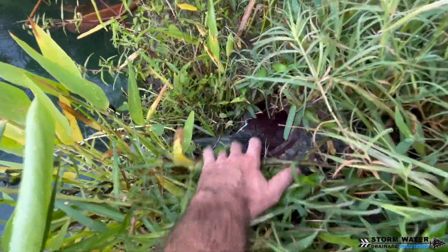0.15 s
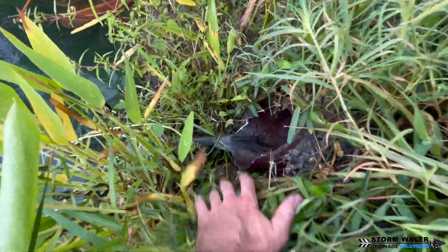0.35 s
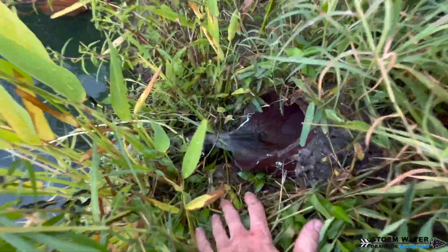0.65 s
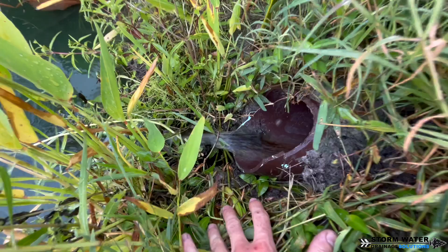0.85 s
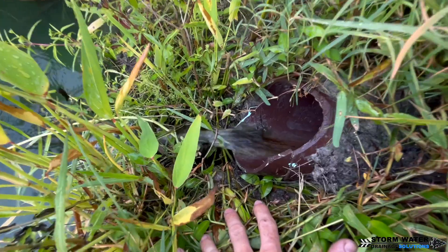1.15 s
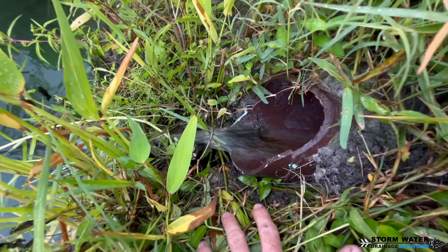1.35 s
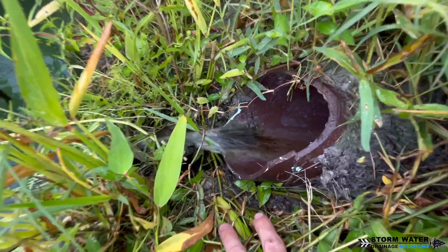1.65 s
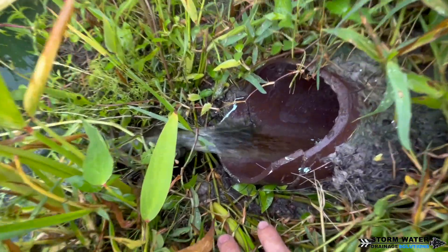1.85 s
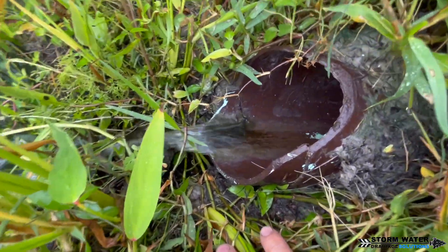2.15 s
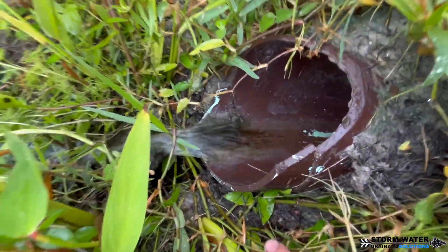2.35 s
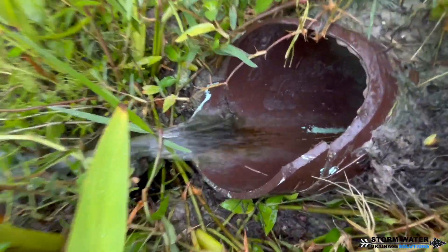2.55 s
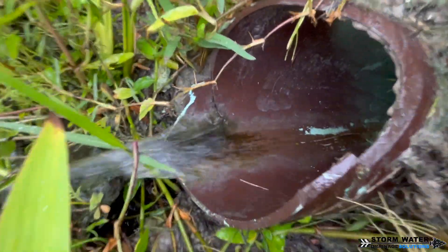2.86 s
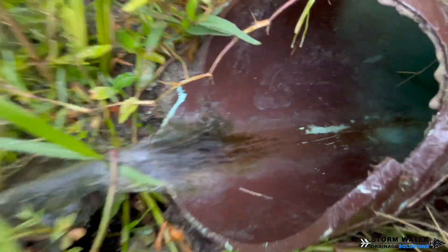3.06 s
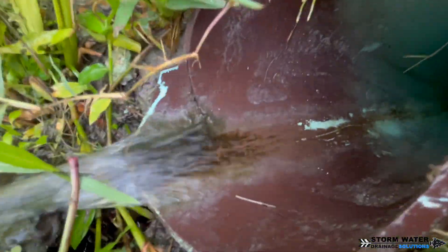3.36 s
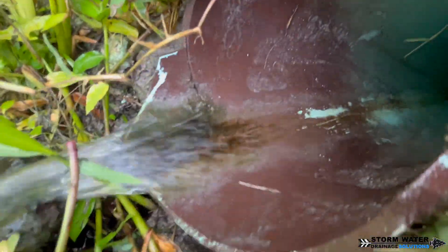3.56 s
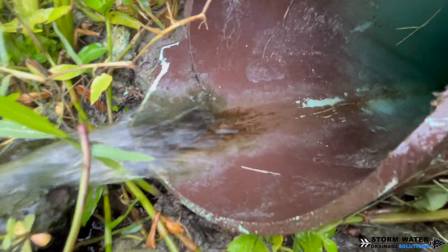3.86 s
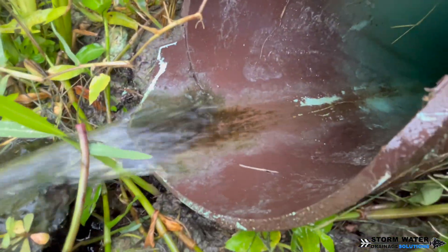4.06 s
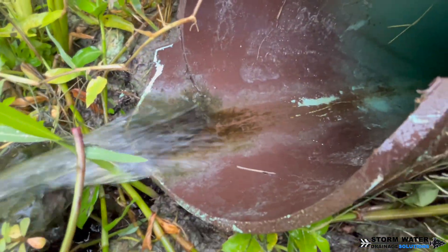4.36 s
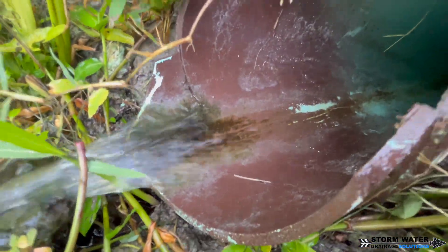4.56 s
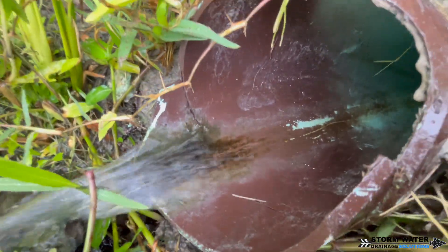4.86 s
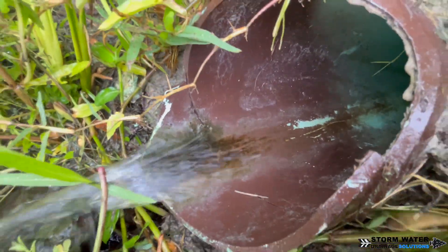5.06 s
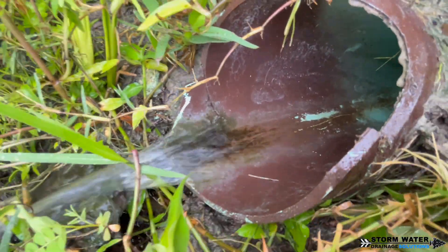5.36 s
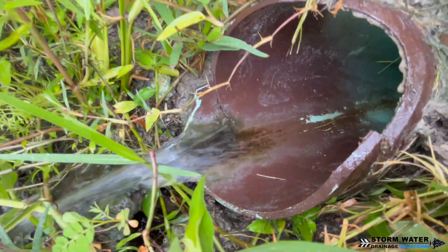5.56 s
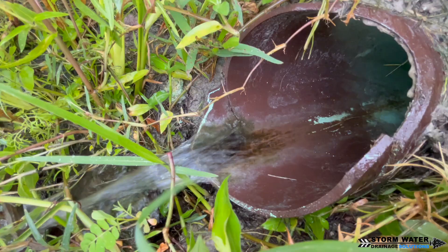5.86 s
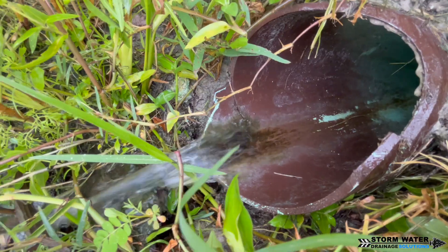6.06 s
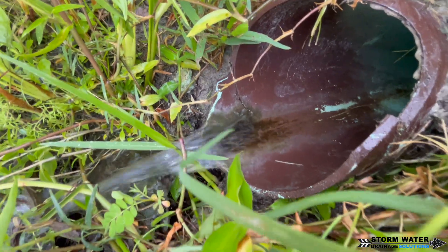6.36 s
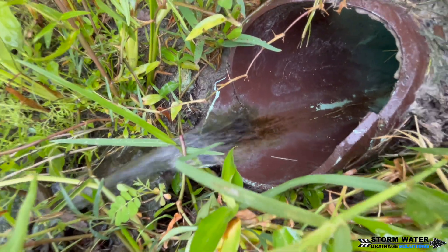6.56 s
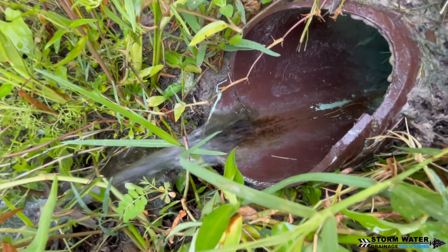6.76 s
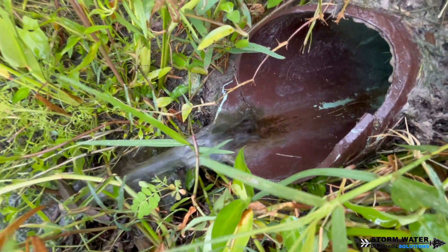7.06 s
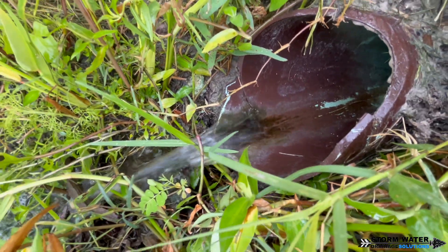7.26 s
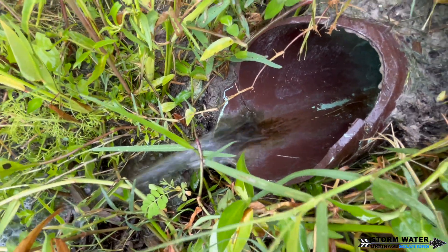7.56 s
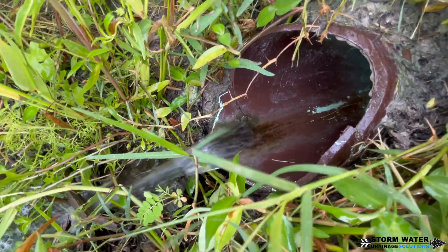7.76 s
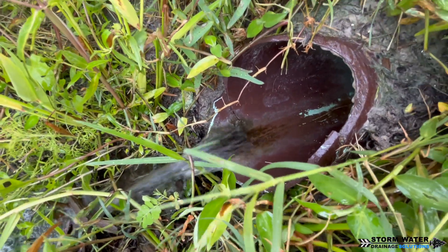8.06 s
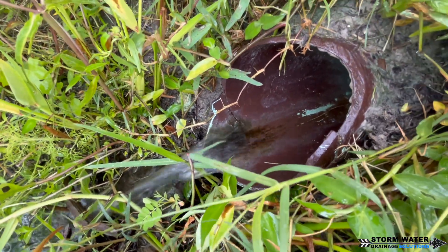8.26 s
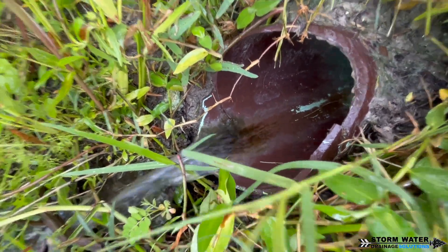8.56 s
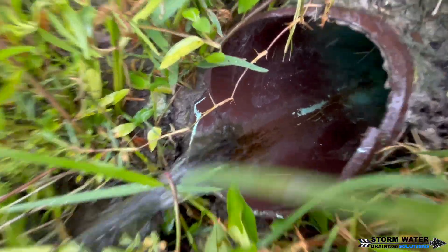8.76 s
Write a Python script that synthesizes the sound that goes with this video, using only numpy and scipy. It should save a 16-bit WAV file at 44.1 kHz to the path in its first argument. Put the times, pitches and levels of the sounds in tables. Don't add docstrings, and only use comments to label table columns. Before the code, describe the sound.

Water runs continuously from a wide clay drain pipe through grass into a pond, heard close by a hand-held stereo microphone in open air. Bright fizz, fine hissing spray and crackling drops lie over a hollow, uneven gurgle. Short gulps pop at the pipe mouth, one distinct at 1 second, with duller glugs deeper inside. Around 2 seconds a longer slop, ringing plinks and a low air thump pass. From 3 to 5 seconds the water is nearest and brightest, wind mostly gone at first; the gurgle thins near 4. At about 4.85 a sharp splash bursts with snapping drops, followed by a strong gulp at 5.35. The water then recedes slightly while deep wind rumble swells near 6 and 6.6 seconds, staying uneven. Another clear gulp comes at 7.5. Near 8.7 the water comes closer again with low buffeting.

```python
import sys
import numpy as np
from scipy import signal
from scipy.fft import rfft, irfft, next_fast_len
from scipy.io import wavfile

SR = 44100
rng = np.random.default_rng(int(sys.argv[2]) if len(sys.argv) > 2 else 0)


def unload_audio(sound):
    columns = np.transpose(np.atleast_2d(sound))
    steps = np.round(np.clip(columns, -1, 1) * 32767)
    wavfile.write(sys.argv[1], SR, steps.astype(np.int16))


def field_ratio(decibels):
    return 10 ** (np.asarray(decibels, dtype=float) / 20)


N = 392490
FALL_LAG, PIPE_LAG = 4.45, -17


def in_time(rows):
    s, *columns = np.transpose(rows)
    return [np.interp(np.arange(N) / SR, s, c) for c in columns]


def bumps(rows):
    t = np.arange(N) / SR
    return sum(height * np.exp(-((t - s) / half) ** 2) for s, height, half in rows)


def rms_one(x):
    return x / np.sqrt(np.mean(x ** 2) + 1e-20)


def colour(x, spectrum):
    size = next_fast_len(N)
    hz, level = np.transpose(spectrum)
    log_hz = np.log(np.arange(size // 2 + 1) * SR / size + 1)
    gain = field_ratio(np.interp(log_hz, np.log(hz), level))
    return rms_one(irfft(rfft(x, size) * gain, size)[..., :N])


def drift(rate):
    r = np.exp(-80 * np.pi * rate / SR)
    slow = signal.lfilter([1], [1, -2 * r, r * r], rng.standard_normal(N // 40 + 2002))[2000:]
    return np.interp(np.arange(N) / 40, np.arange(len(slow)), rms_one(slow))


def grains(per_s, spread_db, low_hz, high_hz, cycles, count):
    sizes = field_ratio(spread_db * np.minimum(rng.exponential(1, N), 4)) * rng.choice([-1, 1], N)
    clicks = sizes * (rng.random(N) < per_s / SR)
    dealt = rng.integers(0, count, N)
    out = 0
    for k, hz in enumerate(np.geomspace(low_hz, high_hz, count)):
        r = field_ratio(-60 * hz / (cycles * SR))
        w = 2 * np.pi * hz / SR
        ring = [1, -2 * r * np.cos(w), r * r]
        out = out + hz * signal.lfilter([0, np.sin(w)], ring, clicks * (dealt == k) + 1e-18)
    return rms_one(out)


def at_ports(x, lag):
    size = next_fast_len(N + 64)
    delay = np.array([[lag], [-lag]]) / 2 + 9
    turn = np.exp(-1j * np.pi * np.arange(size // 2 + 1) * 2 / size * delay)
    return irfft(rfft(x, size) * turn, size)[:, 9:N + 9]


def spread(direct, others, lag, scatter_db):
    return (at_ports(direct, lag) + field_ratio(scatter_db) * others) / np.sqrt(1 + field_ratio(2 * scatter_db))


def left_right(pan_db):
    return field_ratio(pan_db * np.array([[.5], [-.5]]))


def add(out, s, shape):
    i = max(round(s * SR), 0)
    out[..., i:i + shape.shape[-1]] += shape[..., :N - i]


# (time [s], nearness [dB], turn toward the spray [dB])
HAND_APPROACH = [(0.0, -5.5, 2), (1.2, -1.5, -2.5), (2.2, -1, 1), (3.15, 3, -1), (3.9, 4, -4.5),
                 (5.0, 4, 0), (5.9, 2, -0.5), (6.5, 1.5, 0.5), (7.5, 0, 1.5), (8.4, -1, 1), (8.9, 3.5, -2)]


def approach():
    return in_time(HAND_APPROACH)


# (frequency [Hz], level [dB per Hz])
FIZZ_SPECTRUM = [(900, -21), (1600, -4), (2600, 0), (4000, -6), (5200, 1.5), (7000, -2.5), (10000, -7.5)]


def fizz(near_db):
    clumps = drift(20)
    bubbles = [grains(600 * field_ratio(4 * clumps), 4.6, 1000, 9000, cycles=32, count=15) for place in range(3)]
    froth = colour(np.array(bubbles) + field_ratio(-1.5) * rng.standard_normal((3, N)), FIZZ_SPECTRUM)
    return field_ratio(near_db - 44) * left_right(1.4) * spread(froth[0], froth[1:], FALL_LAG, scatter_db=0.5)


def patchy_hiss(shared_db, own_db):
    white = rng.standard_normal((3, N))
    edges = (600, 3000, 5500, 8500, 12000, 19000)
    out = 0
    for k, pair in enumerate(zip(edges, edges[1:])):
        band = signal.sosfilt(signal.butter(2, pair, "band", fs=SR, output="sos"), white)
        out = out + (-1) ** k * band * field_ratio(shared_db + own_db * drift(36))
    return rms_one(out)


# (frequency [Hz], level [dB per Hz])
SPRAY_SPECTRUM = [(1000, -7), (3000, 1), (5200, 7.5), (7500, 0), (10000, 0.5), (13000, 0), (16000, 0)]
# (time [s], rise [dB], half length [s])
SPRAY_SURGES = [
    (4.85, 5, .045),
    (2.05, 3, .06),
    (7.33, 2, .02),
    (1.39, 2, .02),
    (5.885, 2, .012),
]
# (time [s], more scatter between the ports [dB])
HAND_TURNS = [(0, 0), (1.9, 0), (2.0, 8), (2.95, 8), (3.02, 0), (6.7, 0), (6.85, 6), (7.4, 5), (7.55, 0)]


def spray(near_db, turn_db):
    surge_db = bumps(SPRAY_SURGES)
    spatter = drift(35)
    crackle = grains(800 * field_ratio(5 * spatter + 2 * surge_db), 3.9, 3500, 15500, cycles=12, count=14)
    hiss = patchy_hiss(spatter, own_db=2.0)
    mist = colour(field_ratio(1.0) * crackle * [[1], [0], [0]] + hiss, SPRAY_SPECTRUM)
    askew_db, = in_time(HAND_TURNS)
    heard = spread(mist[0], mist[1:], FALL_LAG, scatter_db=-3.5 + askew_db)
    return field_ratio(-42 + 0.76 * near_db + turn_db + surge_db) * heard


def gulp(hz, ms, bright_db):
    cut_hz = 344
    t = np.arange(1100) / SR * 1000 / ms
    settle = cut_hz + 0.785 * (hz - cut_hz)
    pitch = settle + (150 + 1000 * min(field_ratio(bright_db), .6)) * np.exp(-(t / 1.19) ** 1.7)
    swell = (t * np.exp(1 - t)) ** 1.34
    return swell * np.sin(2 * np.pi * (np.cumsum(pitch) / SR + rng.random()))


# (frequency [Hz], level [dB per Hz])
WASH_SPECTRUM = [(250, -0.5), (380, -5.5), (520, -4), (750, -2.5), (1100, 0), (1500, -8), (2200, -18)]
# (time [s], change [dB], half length [s])
FLOW_CHANGES = [
    (4.09, -6, 0.36),
    (5.2, 3, 0.3),
]


def gurgle(near_db):
    crowd = np.zeros(N)
    for when, size, tone, length, bright in rng.random((1500, 5)):
        small = gulp(440 + 700 * tone ** 2.2, 1.2 + 3.5 * length ** 2, -30 + 24 * bright)
        add(crowd, when * N / SR, (size + .1) ** -.5 * small)
    crowd = rms_one(crowd * field_ratio(2.4 * drift(9.2)))
    wash = colour(rng.standard_normal((3, N)), WASH_SPECTRUM) * field_ratio(3 * drift(20))
    bed = field_ratio(0.5) * at_ports(crowd, PIPE_LAG)
    bed = bed + field_ratio(1.5) * spread(wash[0], wash[1:], PIPE_LAG, scatter_db=-4.5)
    return field_ratio(-47 + 0.21 * near_db + bumps(FLOW_CHANGES)) * left_right(-4) * bed


# (time [s], strength [dB], eddy size as lean toward the deep rumble [dB])
WIND_GUSTS = [(0.0, -54.5, -5.5), (1.14, -52.5, -4.5), (2.03, -45.5, 1), (2.4, -50.5, 0), (2.65, -66, -9),
              (3.4, -70, -7), (4.15, -52, -5), (4.34, -47.5, -7), (4.57, -40, -9), (5.06, -45, -5.5),
              (5.62, -46.5, -2.5), (5.95, -32.5, 4), (6.3, -38.5, -2), (6.58, -31, 5.5), (7.05, -37, 0.5),
              (7.58, -41, -0.5), (8.38, -42, -1.5), (8.7, -36.5, 1)]


def gusts():
    return in_time(WIND_GUSTS)


# (frequency [Hz], level [dB per Hz])
ROAR_SPECTRUM = [(15, -55), (25, -29), (59, 1.5), (92, 0), (113, -2.5), (214, -13.5), (263, -24),
                 (303, -19.5), (340, -40), (400, -36.5), (520, -19.5), (880, -120)]


def wind_roar(strength_db, lean_db):
    roar = colour(rng.standard_normal(N), ROAR_SPECTRUM)
    deep = signal.sosfilt(signal.butter(4, 90, fs=SR, output="sos"), roar)
    upper = signal.sosfilt(signal.butter(4, 90, "high", fs=SR, output="sos"), roar)
    puff_s = 0.015
    stirred = bumps([(s + puff_s, field_ratio(db - 18), puff_s) for s, db, pan_db in PORT_PUFFS])
    deep_gain = np.hypot(field_ratio(strength_db + lean_db), stirred)
    return deep_gain * rms_one(deep) + field_ratio(strength_db - lean_db) * rms_one(upper)


# (frequency [Hz], level [dB per Hz])
BUFFET_SPECTRUM = [(20, -36), (55, 0), (75, -1), (100, -9), (200, -20), (400, -24), (1200, -50)]
# (time [s], turbulence [dB], half length [s])
HAND_SWINGS = [
    (0.7, -58, .08),
    (2.062, -43, 0.46),
    (2.695, -46, 0.16),
    (3.15, -55, 0.22),
    (4.648, -42.5, 0.28),
    (8.75, -37.5, 0.35),
]


def buffet(strength_db):
    swirl = colour(rng.standard_normal(N) * field_ratio(1.3 * drift(4.2)), BUFFET_SPECTRUM)
    swings = bumps([(s, field_ratio(db), half) for s, db, half in HAND_SWINGS])
    return np.hypot(field_ratio(-26.5 + 0.61 * strength_db), swings) * swirl * [[-.8], [1.2]]


# (time [s], peak [dB], centre [Hz])
LEAF_CRACKS = [(0.0308, -27, 11600), (0.0882, -22, 7210), (1.3788, -27, 10700), (2.6464, -26, 10200),
               (3.023, -26, 8660), (3.4226, -24, 7050), (4.1185, -26, 6870), (4.4323, -23, 10400),
               (4.4917, -25, 5980), (4.806, -16, 6300), (4.815, -23, 5600), (4.86, -20, 8000),
               (4.835, -21, 7000), (4.8459, -15, 8260), (4.852, -20, 11000), (4.8823, -21, 6080),
               (4.9122, -23, 5750), (5.008, -25, 11000), (5.2245, -26, 8420), (5.473, -25, 7030),
               (5.878, -18, 12500), (5.9569, -20, 9180), (6.0901, -25, 8730), (6.2272, -24, 11200),
               (7.1003, -25, 10100), (7.3696, -24, 5640), (7.5118, -25, 8390), (7.7283, -26, 9040),
               (7.8955, -20, 12500), (1.011, -23, 3300)]


def cracks():
    drops = np.zeros(N)
    faint = [(when * N / SR, -28.5 + 3 * (size - .5), 5600 * 2.3 ** tone)
             for when, size, tone in rng.random((36, 3))]
    for s, db, hz in LEAF_CRACKS + faint:
        cycle = np.arange(400) * hz / SR
        noise = hz / 20000 * np.diff(rng.standard_normal(401))
        waver = np.cumsum(.35 * rng.standard_normal(400))
        fade = np.exp(-cycle / 7 - np.arange(400) / 120)
        add(drops, s, field_ratio(1.3 * db + 7.5) * fade * (noise + np.sin(2 * np.pi * cycle + waver)))
    return at_ports(drops, FALL_LAG)


def out_of_pipe(gulps):
    loud = np.zeros((2, N))
    for s, db, hz, pan_db, ms, bright_db in gulps:
        add(loud, s - .0005, field_ratio(db + 6.0) * left_right(pan_db) * gulp(hz, ms, bright_db))
    back = round(.016 * SR)
    loud[:, back:] += field_ratio(-19) * loud[:, :-back]
    return at_ports(loud, PIPE_LAG)


# (time [s], peak [dB], centre [Hz], left-right [dB])
MOUTH_POPS = [(0.225, -33, 700, -1), (0.335, -28.5, 510, -9.5), (0.498, -31, 497, -2.5),
              (0.682, -30, 840, -1), (1.012, -21.5, 503, -10), (1.867, -33.5, 520, -10),
              (2.019, -29.5, 735, -3.5), (2.062, -27.5, 573, -5), (2.147, -31, 760, -6),
              (2.51, -31, 720, -7.5), (2.995, -33.5, 580, -10), (3.724, -47.5, 766, 28),
              (3.825, -31, 724, 2), (4.152, -35.5, 990, -6), (4.245, -25.5, 830, -2),
              (5.065, -33, 500, -13), (5.211, -26, 830, -5.5), (5.244, -27, 584, -1),
              (5.358, -19, 550, -12), (6.456, -27.5, 810, -3.5), (6.768, -30.5, 700, -1.5),
              (6.833, -25, 840, -6), (7.374, -30, 540, 1), (7.514, -21.5, 550, -0.5), (7.637, -33, 565, 1),
              (7.916, -31.5, 567, 0), (8.001, -34, 780, 0), (8.49, -27.5, 467, -3.5),
              (8.752, -30.5, 407, -6)]


def pops():
    return out_of_pipe([(s, db, hz, pan_db, 1.52, -10 - 0.6 * pan_db) for s, db, hz, pan_db in MOUTH_POPS])


# (time [s], peak [dB], left-right [dB])
PORT_PUFFS = [(0.325, -49, -10), (1.003, -38, -8), (4.14, -43, -6), (5.351, -40, -10), (5.59, -37, -8),
              (0.692, -31, -17), (1.819, -27, -11), (2.053, -23, -9), (2.736, -23, -7), (2.889, -37, -6),
              (3.051, -26.5, -7), (3.265, -32, -2), (3.839, -47, -1), (4.972, -39, -10), (6.32, -30, -15),
              (8.743, -34, -16)]


def thumps():
    out = np.zeros((2, N))
    t = np.arange(5000) / SR
    pitch = 55 + 480 * np.exp(-t / 0.00486)
    swell = t / .018 * np.exp(1 - t / .018) ** 1.2
    puff = swell * np.sin(2 * np.pi * np.cumsum(pitch) / SR)
    for s, db, pan_db in PORT_PUFFS:
        add(out, s, field_ratio(db + pan_db * np.array([[1], [0]])) * puff * [[-1], [1]])
    return out


# (time [s], peak [dB], pitch [Hz])
SURFACE_PLINKS = [(0.41, -34.5, 2140), (0.525, -34, 1590), (2.537, -35, 1900), (1.527, -20, 4240),
                  (1.8663, -27, 2850), (1.9995, -18.5, 4100), (2.0618, -16, 4100), (2.55, -20.5, 3180),
                  (3.124, -20, 3980), (3.2515, -31, 2920), (3.486, -28, 2723), (3.669, -24, 2890),
                  (3.87, -28, 2410), (4.193, -25.5, 2340), (4.3306, -29, 2690), (4.492, -15.5, 4220),
                  (4.671, -31, 2980), (4.744, -27, 2840), (4.803, -17, 4230), (4.9906, -29, 2500),
                  (5.132, -29, 3100), (5.278, -26, 2570), (5.666, -20.5, 4240), (6.326, -27.5, 1890),
                  (6.4122, -17, 4240), (6.9204, -28, 3140), (7.7957, -33, 2070), (8.5404, -30.5, 2430),
                  (8.6906, -24.5, 4060)]


def plinks():
    drops = np.zeros(N)
    for s, db, hz in SURFACE_PLINKS:
        cycle = np.arange(1200) * hz / SR
        ring = np.sin(2 * np.pi * cycle * (1 + 0.00068 * cycle))
        add(drops, s, field_ratio(db - 3.0) * np.exp(-cycle / 11.3) * ring)
    return at_ports(drops, FALL_LAG)


# (time [s], peak [dB], centre [Hz])
DEEP_GLUGS = [(0.705, -25, 514), (0.805, -35.5, 584), (1.425, -41, 710), (1.497, -31.5, 570),
              (2.662, -34, 477), (2.788, -38.5, 547), (3.05, -37, 620), (3.23, -37, 700), (3.379, -34, 460),
              (3.415, -35.5, 510), (3.8, -32.5, 493), (3.941, -39.5, 570), (4.474, -37.5, 610),
              (4.848, -29.5, 500), (5.746, -36, 563), (5.88, -28, 584), (6.002, -35.5, 530),
              (6.089, -37, 517), (6.186, -38, 490), (6.406, -31, 541), (6.718, -38, 533),
              (7.718, -35.5, 540), (8.148, -39, 636), (8.844, -40, 530)]


def glugs():
    return out_of_pipe([(s, db, hz, -0.8, 1000 * 1.46 / hz, -33.5) for s, db, hz in DEEP_GLUGS])


def scene():
    near_db, turn_db = approach()
    strength_db, lean_db = gusts()
    water = fizz(near_db) + spray(near_db, turn_db) + cracks() + plinks()
    pipe = gurgle(near_db) + pops() + glugs()
    wind = wind_roar(strength_db, lean_db) + buffet(strength_db) + thumps()
    return water + pipe + wind


def low_pass(x):
    return signal.sosfilt(signal.butter(12, 16510, fs=SR, output="sos"), x)


def record(dry):
    return low_pass(dry)


dry = scene()
out = record(dry)
unload_audio(out)
```